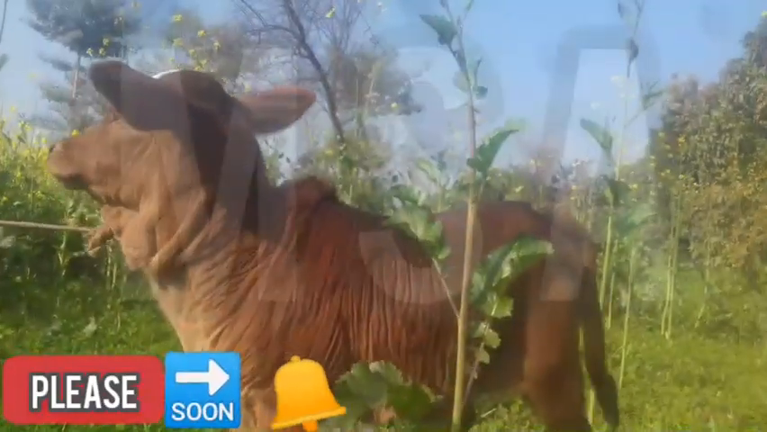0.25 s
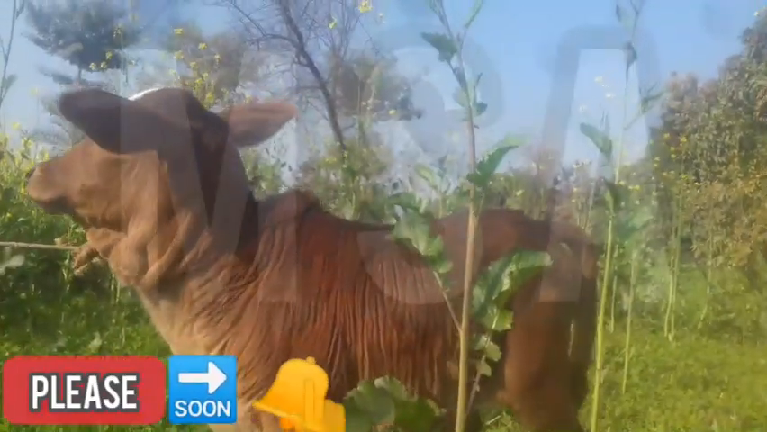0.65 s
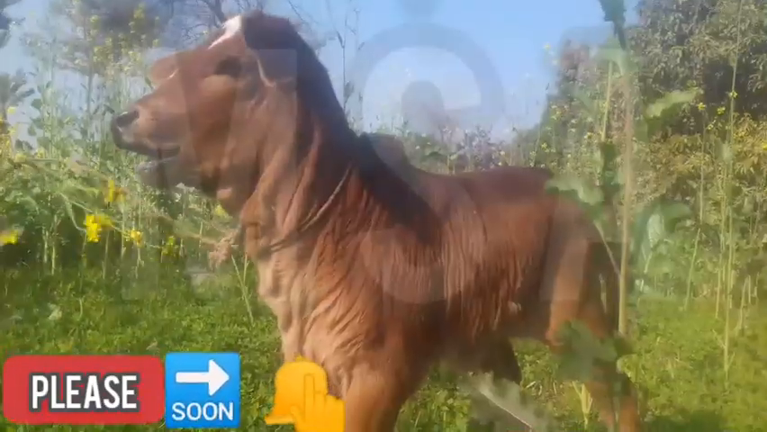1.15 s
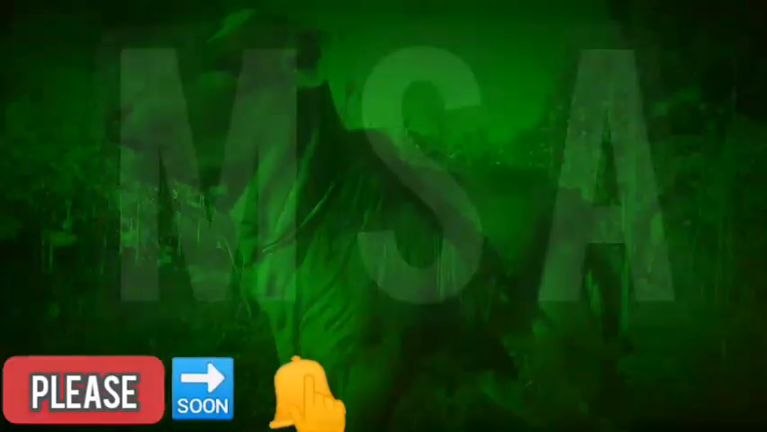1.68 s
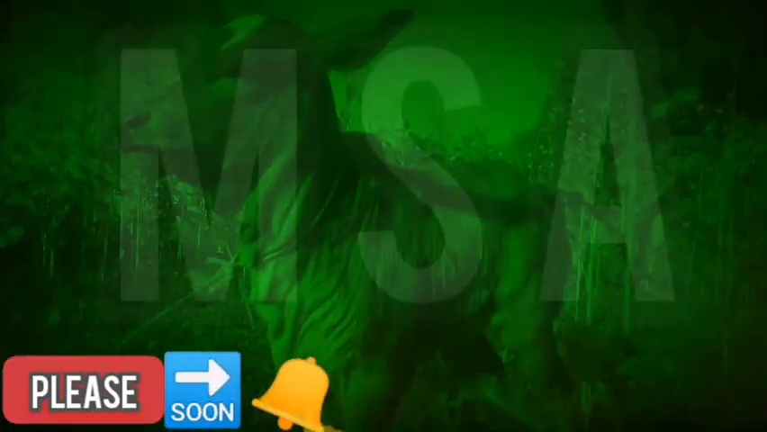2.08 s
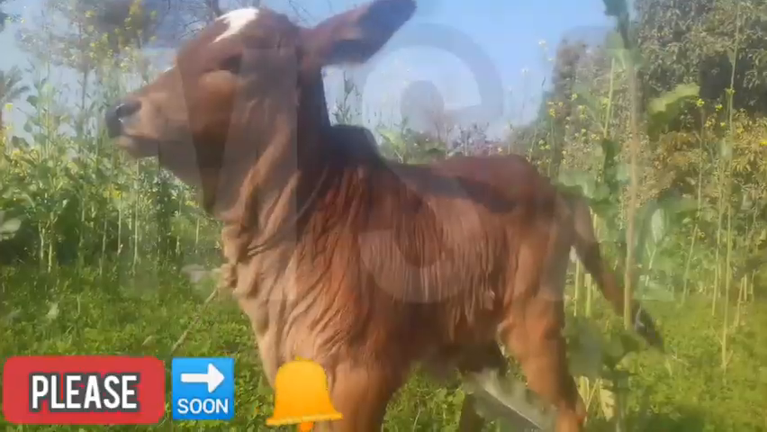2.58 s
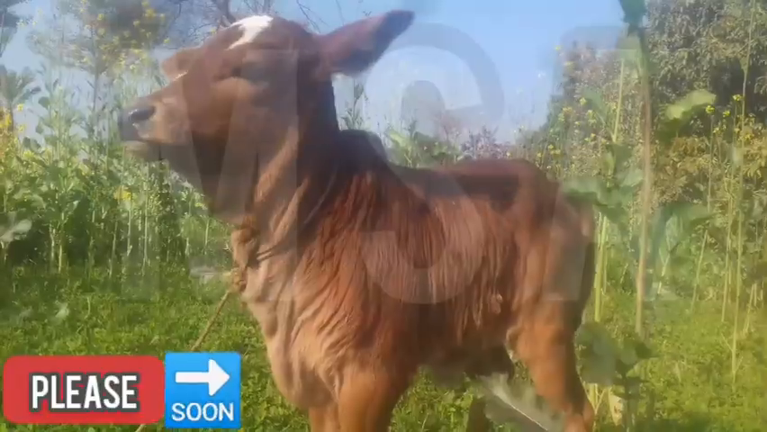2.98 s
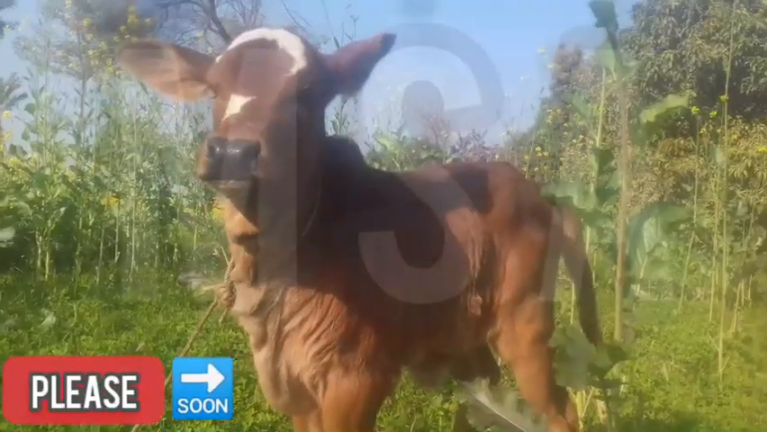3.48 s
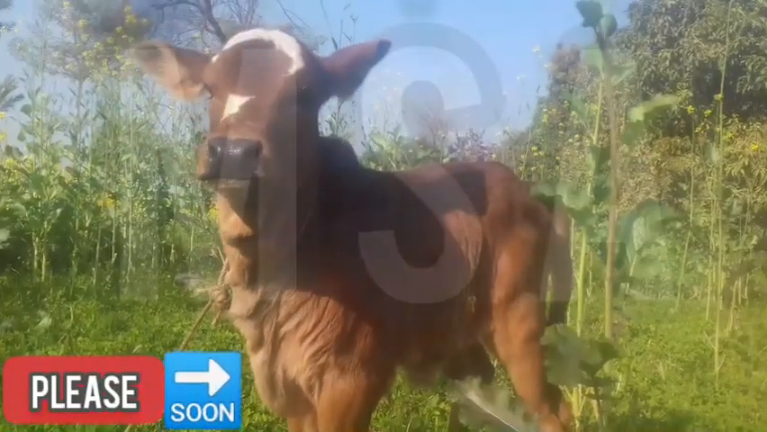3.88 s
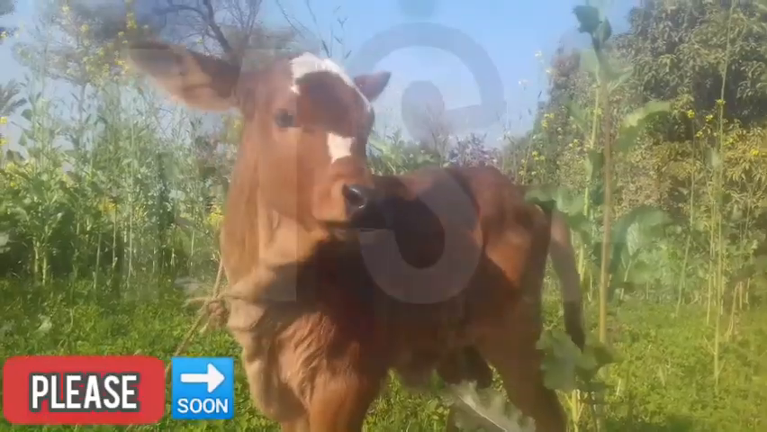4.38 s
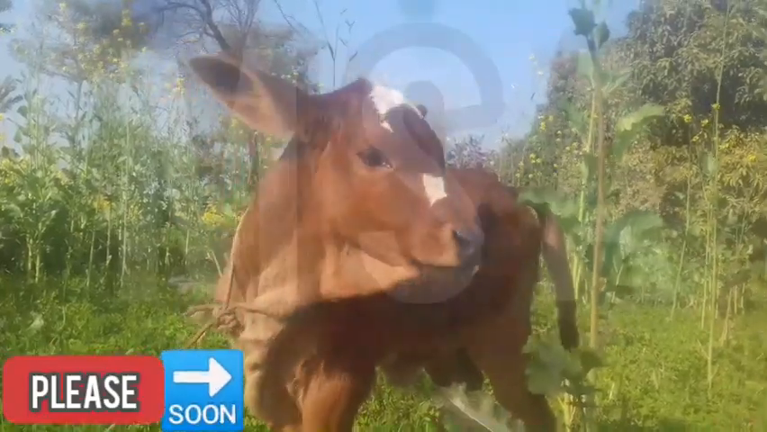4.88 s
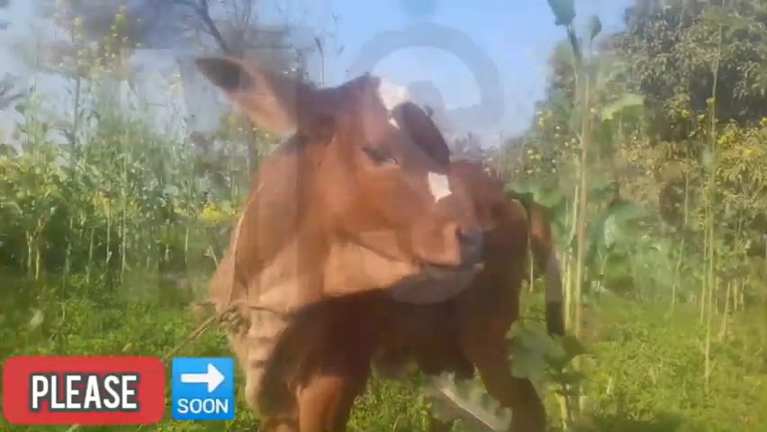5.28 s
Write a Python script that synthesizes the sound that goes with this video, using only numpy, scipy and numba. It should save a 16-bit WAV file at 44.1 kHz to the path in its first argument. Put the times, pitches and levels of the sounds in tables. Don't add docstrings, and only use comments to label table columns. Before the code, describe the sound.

In an open windy field, far hoarse crows caw faintly as fingers tick and brush a handheld phone. At one second a young calf a few metres away moos loudly for about a second, sinking into a creak and snort. A distant cock crows, then a nearer crow barks and fingers tick again.

```python
import sys
import numpy as np
from scipy import signal
from scipy.fft import rfft, irfft
from scipy.io import wavfile
from scipy.ndimage import uniform_filter1d, minimum_filter1d, map_coordinates
from numba import njit

SR = 44100
rng = np.random.default_rng(int(sys.argv[2]) if len(sys.argv) > 2 else 0)


def wav_record(signal):
    frames = np.transpose(np.atleast_2d(signal))
    bounded = np.clip(frames, -1, 1)
    quanta = np.round(bounded * 32767).astype(np.int16)
    wavfile.write(sys.argv[1], SR, quanta)


def volts_from_decibels(level):
    exponent = np.asarray(level, float) / 20
    return 10 ** exponent


N = 244314
TIME = np.arange(N) / SR


def level(x, db):
    return x * volts_from_decibels(db) / np.sqrt(np.mean(x ** 2))


@njit
def resonate(x, hz, width):
    y, b, l = np.empty(len(x)), 0., 0.
    for i in range(len(x)):
        g, k = np.tan(np.pi * hz[i] / SR), width / hz[i]
        v = (b + g * (x[i] + 1e-18 - l)) / (1 + g * (g + k))
        b, l, y[i] = 2 * v - b, l + 2 * g * v, k * v
    return y


def band(x, hz, width):
    return resonate(x, hz + np.zeros(len(x)), float(width))


def modes(x, table):
    return sum((-1) ** k * volts_from_decibels(db) * band(x, hz, w) for k, (hz, w, db) in enumerate(table))


def walk(rate_hz):
    hold = int(SR / rate_hz)
    steps = np.repeat(rng.standard_normal(N // hold + 1), hold)
    return 1.3 * uniform_filter1d(uniform_filter1d(steps, hold), hold)[:N]


def colour(table, hz):
    table_hz, table_db = np.transpose(table)
    return np.interp(np.log(hz), np.log(table_hz), table_db)


def echoes(x, delay_s, t60_s, dull_hz):
    t = np.arange(SR // 2) / SR - delay_s
    decay = np.clip(t / 0.0087, 0, 1) * volts_from_decibels(-60 * np.maximum(t, 0) / t60_s)
    response = rng.standard_normal(len(t)) * decay
    response = signal.lfilter([1], [1, -np.exp(-2 * np.pi * dull_hz / SR)], response)
    return signal.fftconvolve(x, response / np.sqrt(np.sum(response ** 2)))[:N]


def field():
    # (frequency [Hz], density [dB per Hz])
    air = [(20, -31.5), (40, -15.5), (70, -2), (134, -0.5), (228, -6), (607, -17.5), (825, -21.5),
           (1000, -13.5), (1400, -18.5), (1850, -10.5), (2320, -40.5), (2700, -38.5), (6000, -41.5),
           (16000, -52.5)]
    # (frequency [Hz], width [Hz], level [dB])
    insects = [(9500, 150, -104), (14270, 160, -92.5)]
    out, swell = 0, walk(0.63)
    for hz in 22 * 2 ** np.arange(0, 9.6, 1 / 3):
        noise = band(band(rng.standard_normal(N), hz, hz / 3), hz, hz / 3)
        out = out + volts_from_decibels(colour(air, hz) + 0.66 * swell + 1.2 * walk(23)) * noise
    trills = 0
    for hz, width_hz, db in insects:
        tone = band(band(rng.standard_normal(N), hz, width_hz), hz, width_hz)
        trills = trills + volts_from_decibels(2 * walk(15)) * level(tone, db)
    return level(out, -60) + trills


def crows():
    # (time [s], length [s], top pitch [Hz], level [dB], hoarseness [0-1])
    caws = [
        (0.021, 0.33, 434, -59, 0.38),
        (0.786, 0.24, 508, -62, 0.4),
        (0.862, 0.15, 488, -54.5, 0.57),
        (2.079, .58, 564.6, -59, .55),
        (2.182, .46, 635, -56, 0.73),
        (2.718, 0.41, 420, -56, 0.57),
        (3.719, 0.16, 1001, -48.5, 0.94),
    ]
    # (time [s], length [s], top pitch [Hz], level [dB], hoarseness [0-1])
    barks = [
        (4.39, .31, 506.7, -48.5, 0.76),
        (4.71, .23, 494, -52.5, 0.67),
        (4.951, 0.24, 492.7, -58.5, 0.59),
    ]
    # (frequency [Hz], level [dB])
    crow_beak = [(500, -26), (700, -19), (900, -11.5), (1250, -2), (1750, 6), (2100, -5), (2500, -22),
                 (3000, -42), (4300, -28.5), (5300, -45.5), (6500, -34)]
    calls = [c + (.08, .45) for c in caws] + [c + (.17, .17) for c in barks]
    end_loss_db = 5
    out = 0
    for s, length, top_hz, db, hoarse, dip, top in calls:
        gate = np.clip(np.minimum(TIME - s, s + length - TIME) / 0.019, 0, 1)
        along = np.clip((TIME - s) / length, 0, 1) - top
        off = along / max(top, 1 - top)
        hz = top_hz * (1 - dip * np.abs(off) ** 1.5)
        phase = 2 * np.pi * np.cumsum(hz * (1 + .12 * hoarse ** 8 * walk(200))) / SR
        rattle = 2 * np.pi * np.cumsum(85 * (1 + .025 * walk(30))) / SR
        shake = 2.2 * hoarse * np.sin(rattle)
        overtones = range(1, int(6800 / hz.max()))
        stack = sum(volts_from_decibels(colour(crow_beak, k * hz)) * np.sin(k * phase + shake) for k in overtones)
        out = out + gate * volts_from_decibels(db - end_loss_db * off ** 2) * stack * (1 + 0.5 * hoarse * np.cos(rattle))
    return 0.98 * out + volts_from_decibels(-7.0) * echoes(out, 0.011, 0.35, dull_hz=3000)


def handling():
    # (time [s], peak [dB], low ring [dB re peak], sharp edge [dB re peak])
    finger_ticks = [(0.261, -27, -13.5, -12.5), (0.305, -32, -9.5, -42), (0.319, -34, -11, -27),
                    (0.34, -43, -6, -23), (0.452, -24.5, -16, -17.5), (0.499, -29.5, -11.5, -19),
                    (0.603, -41, -8, -33), (0.733, -29.5, -19.5, -13.5), (1.001, -9.5, -17, -19),
                    (4.888, -35, -8, -18), (5.01, -40.5, -2.5, -47), (5.19, -23, -18, -18),
                    (5.197, -26.5, -8, -16), (5.214, -18.5, -14, -13.5), (5.237, -21, -14, -18),
                    (5.343, -16, -14, -12.5)]
    # (frequency [Hz], width [Hz], level [dB])
    case = [(356, 67, 3.5), (993, 86, -0.5), (1236, 140, 3.5), (1790, 310, -1), (2800, 360, -18),
            (4400, 84, -28), (5420, 220, -50)]
    # (time [s], peak [dB], ring [Hz], width [Hz])
    case_knocks = [
        (0.913, -13.5, 500, 500),
        (.915, -27.5, 129, 120),
        (1.096, -32.5, 270, 91),
        (2.43, -53, 450, 101),
    ]
    # (time [s], length [s], level [dB])
    brushes = [
        (0.474, 0.046, -51.5),
        (0.517, 0.058, -57),
        (0.601, 0.018, -56),
        (5.166, 0.054, -44),
        (5.517, 0.022, -58),
    ]
    s, db, low_db, edge_db = np.transpose(finger_ticks)
    low, mid, edge = np.zeros((3, N))
    at = (s * SR).astype(int)
    low[at], mid[at], edge[at] = volts_from_decibels(db + low_db), volts_from_decibels(db), volts_from_decibels(db + edge_db)
    ticks = volts_from_decibels(43) * modes(low, case[:1]) - volts_from_decibels(25.0) * modes(mid, case[1:4]) + volts_from_decibels(43) * modes(edge, case[4:])
    ticks = ticks + volts_from_decibels(28.0) * band(edge, 3070, 530) + volts_from_decibels(-1.5) * band(edge, 4800, 3000)
    ticks = band(band(ticks, 1500, 5000), 1500, 5000)

    knocks = 0
    for s, db, hz, width_hz in case_knocks:
        blow = -1. * (np.arange(N) == int(s * SR))
        ring = band(band(blow, hz, width_hz), hz, 3 * width_hz)
        ring = ring + volts_from_decibels(-25) * band(band(blow, 1100, 1100), 1100, 2000)
        knocks = knocks + volts_from_decibels(db) * ring / np.max(np.abs(ring))

    grains = rng.standard_normal(N) * volts_from_decibels(3.5 * rng.exponential(size=N)) * (rng.random(N) < .15)
    rub = level(modes(grains, case), 0) + level(band(band(grains, 2900, 2300), 1730, 2300), -11.0)
    strokes = sum(volts_from_decibels(db) * np.sin(np.pi * np.clip((TIME - s) / length, 0, 1)) for s, length, db in brushes)
    return ticks + knocks + strokes * rub


def fold_pulses(hz, on, cycles):
    taut_hz, slack_hz = 114, 63
    at_s = np.interp(np.arange(int(cycles[-1])) + 0.048, cycles[on], TIME[on])
    time_chance, size_chance = rng.standard_normal((2, len(at_s)))
    period_s = 1 / np.interp(at_s, TIME, hz)
    slack = np.clip((taut_hz - 1 / period_s) / (taut_hz - slack_hz), 0, 1)
    jitter = .001 + .05 * slack ** 1.5
    shimmer_db = .25 + 1.5 * slack
    at = (at_s + period_s * jitter * time_chance) * SR
    size = volts_from_decibels(shimmer_db * size_chance) * np.sqrt(period_s * SR)
    taps = at.astype(int)[:, None] + np.arange(-8, 9)
    pulses = np.zeros(N)
    pulses[taps] = size[:, None] * np.sinc(taps - at[:, None]) * np.hanning(19)[1:-1]
    return pulses


def tract(x, tint, stretch):
    parts_hz = [1250, 1700, 2950, 7400, 10000]
    # (frequency [Hz], level [dB])
    slope = [(100, -53.5), (250, -55.5), (800, -29.5), (1800, -32.5), (3000, -44.5), (5500, -59),
             (8000, -76.5), (11000, -83.5), (16000, -77.5)]
    # (frequency [Hz], width [Hz], level
    # [dB])
    tract_modes = [(539.5, 48, 50), (740.3, 45, -17.5), (1224, 110, -21.5), (1526.3, 24, 19), (2014, 130, 20.5),
                   (2382, 69, -12), (2467, 72, 18), (2750, 50, 13.5), (2904, 320, -34), (3170, 46, 26),
                   (3566, 240, 13), (4278, 330, 14.5), (4870, 450, 24.5), (6220, 50, 13), (6990, 30, 17.5),
                   (8050, 250, -1), (8460, 700, 18), (10700, 590, 14), (12100, 50, 13.5), (14360, 200, 16.5),
                   (230, 160, -12), (687, 30, -9), (860, 150, -8.5)]
    hz = np.maximum(np.fft.rfftfreq(8192, 1 / SR), 1)
    db = colour(slope, hz)
    for centre_hz, width_hz, top_db in tract_modes:
        moved_hz = centre_hz * stretch ** min(1, 600 / centre_hz)
        away = (2 * (hz - moved_hz) / max(width_hz, centre_hz / 45)) ** 2
        db = db + np.sign(top_db) * 10 * np.log10((away + volts_from_decibels(2 * abs(top_db))) / (away + 1))
    cepstrum = irfft(np.log(volts_from_decibels(db + colour(tint, hz))))
    cepstrum[1:4096] *= 2
    cepstrum[4097:] = 0
    response = irfft(np.exp(rfft(cepstrum)))
    sound = rfft(signal.fftconvolve(x, response)[:N])
    bins_hz = np.fft.rfftfreq(N, 1 / SR)
    above = [1 / (1 + np.exp((edge_hz - bins_hz) / 30)) for edge_hz in parts_hz]
    parts = [irfft(sound * (a - b), N) for a, b in zip([1] + above, above + [0])]
    flutter, flutter_s = .62, .0027
    again = np.r_[-flutter, np.zeros(int(flutter_s * SR)), 1]
    return np.array(parts[:3] + [signal.lfilter(again, again[::-1], part) for part in parts[3:]])


def snort():
    # (frequency [Hz], width [Hz], level [dB])
    snort_modes = [(520, 125, 5), (850, 330, -5), (1470, 180, 4.5), (1980, 400, -1), (3600, 1760, -24.5)]
    start_s, length_s = 2.03, .12
    swell = np.sqrt(np.sin(np.pi * np.clip((TIME - start_s) / length_s, 0, 1)) + 1e-12)
    return swell * level(modes(rng.standard_normal(N), snort_modes), -44)


def calf():
    # (time [s], pulse rate [Hz], throat level [dB], effort [dB])
    moo = [
        (0.963, 107.8, -22, 1.5),
        (1.191, 117.8, -18.5, 0.5),
        (1.389, 116.2, -16, 1),
        (1.655, 117.2, -16.5, 1),
        (1.823, 114.5, -18, 2),
        (1.868, 110.7, -15, -4),
        (1.93, 97.55, -18.5, 1),
        (1.997, 71.07, -25.5, 3.5),
        (2.06, 62.3, -40.5, -7.5),
    ]
    # (level at rest [dB re throat], slope [dB per dB of effort])
    brighten = [(0.5, 1.16), (-1.5, 1.06), (-20.5, 0.95)]
    # (frequency [Hz], level [dB re pulses])
    hiss = [(40, -22), (170, -6), (300, -14), (500, -34), (800, -24), (2000, -33), (4000, -17), (6000, -6),
            (9000, -3), (15000, 0)]
    moo_s, *columns = np.transpose(moo)
    start_s, end_s = moo_s[0], moo_s[-1]
    hz, throat_db, effort_db = [np.interp(TIME, moo_s, column) for column in columns]
    throat_db = throat_db + 3 * np.exp(-np.abs(TIME - start_s) / .012)
    mouth_db, lips_db, teeth_db = (rest_db + slope * effort_db for rest_db, slope in brighten)
    hz = hz * (1 + .0035 * walk(22))
    on = (TIME >= start_s - .016) & (TIME < end_s)
    cycles = np.cumsum(hz * on) / SR
    pulses = fold_pulses(hz, on, cycles)
    puff = 2 * rng.standard_normal(N) * on * np.exp(-(cycles % 1) / 3.6)

    closed, opened = (tract(pulses, [(1, 0)], stretch) + tract(puff, hiss, stretch) for stretch in (.93, 1.02))
    jaw_open, jaw_shuts_s, jaw_takes_s = 0.55, 1.8, 0.16
    jaw = np.clip(jaw_open * np.minimum(1, 1 - (TIME - jaw_shuts_s) / jaw_takes_s), 0, 1)
    parts = (1 - jaw) * closed + jaw * opened
    parts = parts / np.sqrt(np.mean(parts[:, on] ** 2, axis=1))[:, None]
    detour = np.arange(N) - SR * (.0011 + .00012 * walk(4))
    parts[3:] += [.28 * map_coordinates(part, [detour], order=3) for part in parts[3:]]

    shut_s, fade_s, first_db, swell_db_per_s, left_db = 1.13, .06, -12, 34.5, -24
    last_db = first_db + swell_db_per_s * (shut_s - start_s)
    whistle_db = np.interp(TIME, [start_s, shut_s, shut_s + fade_s], [first_db, last_db, left_db])
    part_db = np.array([0 * hz, mouth_db, lips_db, teeth_db, teeth_db + whistle_db, teeth_db - 32])
    voice = np.sum(parts * volts_from_decibels(throat_db + part_db), axis=0)
    voice = voice * (TIME >= start_s) + snort()

    to_trees = band(band(voice, 900, 500), 900, 500) + .15 * band(voice, 2200, 900)
    near = volts_from_decibels(-21) * echoes(to_trees, .1, .07, dull_hz=4000)
    return voice + near + volts_from_decibels(-43) * echoes(voice, .03, .2, dull_hz=3000)


def cock():
    # (time [s], length [s], pitch [Hz], climb [Hz per s], level [dB])
    crow_notes = [
        (3.05, .14, 464, 88, -60),
        (3.23, 0.08, 505, 299, -64.5),
        (3.36, 0.18, 520, 170.5, -66),
        (3.58, 0.19, 636, -1, -62.5),
        (4.26, 0.18, 485, 259.5, -67),
    ]
    # (frequency [Hz], level [dB])
    cock_beak = [(950, -18), (1280, 0.5), (1500, 3), (1700, -16), (1900, -7), (2150, 0), (2500, -8),
                 (2750, -30)]
    scoop, slur_s, glide_s, edge_s = 0.16, .06, 0.063, 0.053
    hz, gain = np.zeros((2, N))
    for s, length, note_hz, climb, db in crow_notes[::-1]:
        hz[TIME < s] = note_hz * (1 - scoop)
    for s, length, note_hz, climb, db in crow_notes:
        held = (TIME >= s) & (TIME < s + length + slur_s)
        hz[held] = note_hz + climb * np.minimum(TIME[held] - s, length)
        gain[held & (TIME < s + length + slur_s / 2)] = volts_from_decibels(db)
    hz = np.where(hz > 0, hz, note_hz)
    hz = np.maximum(uniform_filter1d(hz, int(glide_s * SR)), 100)
    phase = 2 * np.pi * np.cumsum(hz) / SR
    stack = 0
    for k in range(2, 6):
        stack = stack + np.sqrt(2) * volts_from_decibels(colour(cock_beak, k * hz) + 1.34 * walk(30)) * np.sin(k * phase)
    out = uniform_filter1d(gain, int(edge_s * SR)) * stack
    return out + volts_from_decibels(-9.5) * echoes(out, 0.0079, 0.58, dull_hz=3020)


def scene():
    return (field() + crows() + handling() + calf() + cock())[None, :]


def top_cut(x):
    return signal.sosfilt(signal.butter(12, 16510, fs=SR, output="sos"), x)


def record(dry):
    gain = minimum_filter1d(np.minimum(1, .87 / (np.abs(dry) + 1e-9)), 800)
    limited = dry * uniform_filter1d(gain, 800)
    low_pass = signal.ellip(8, .2, 60, 15800, fs=SR, output="sos")
    return top_cut(signal.sosfilt(low_pass, limited))


dry = scene()
out = record(dry)
wav_record(out)
```